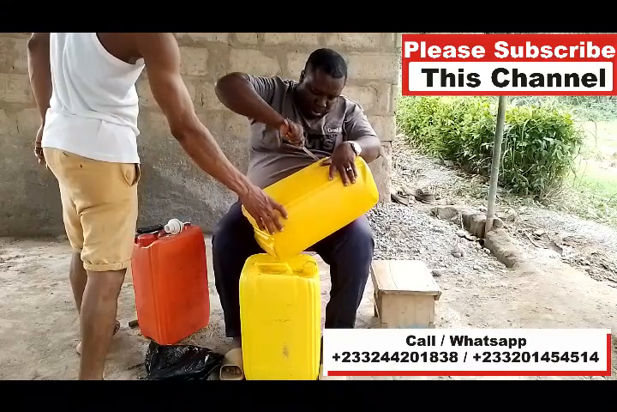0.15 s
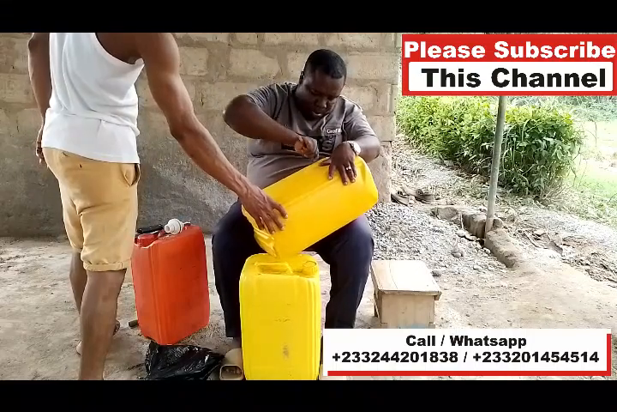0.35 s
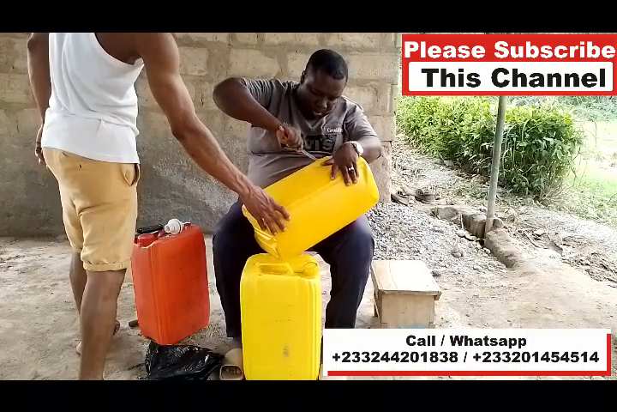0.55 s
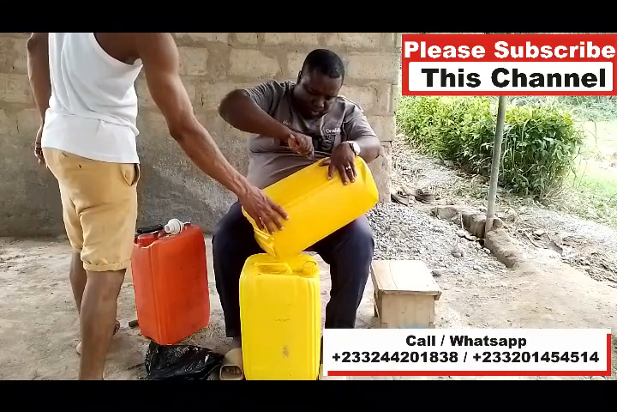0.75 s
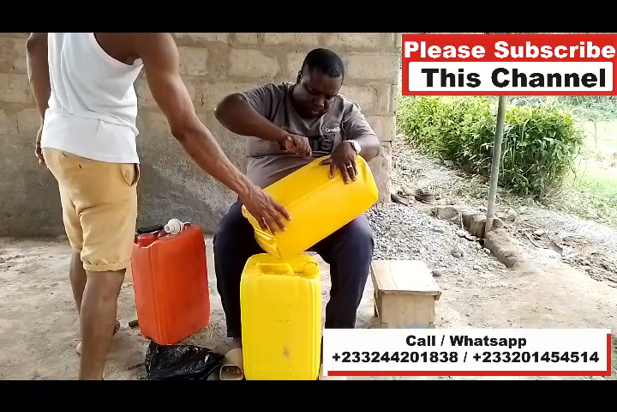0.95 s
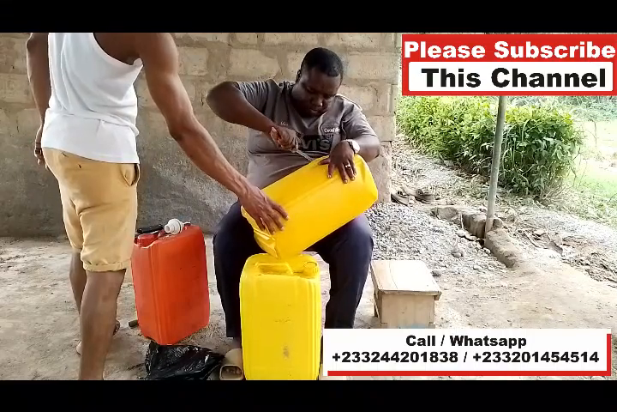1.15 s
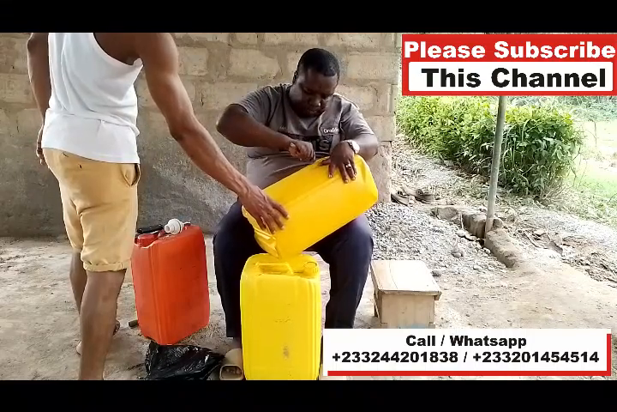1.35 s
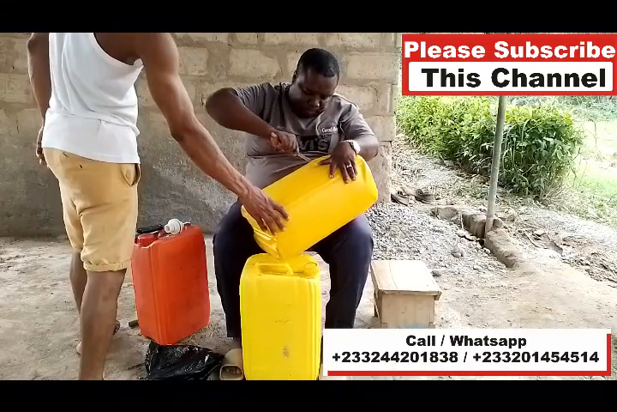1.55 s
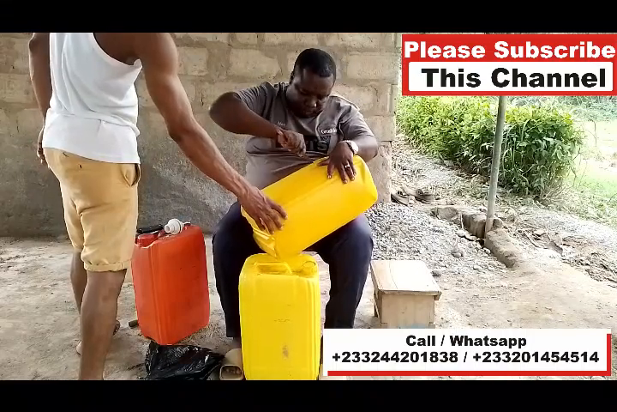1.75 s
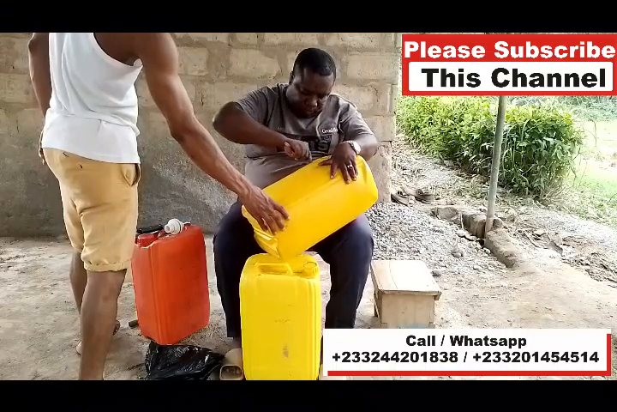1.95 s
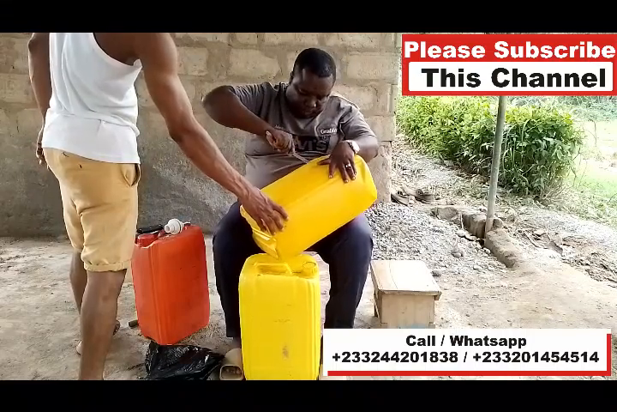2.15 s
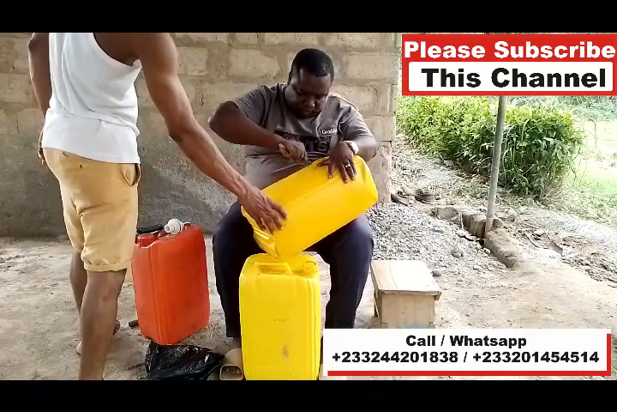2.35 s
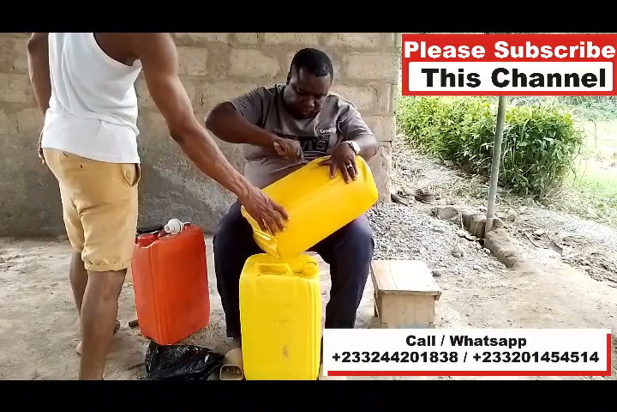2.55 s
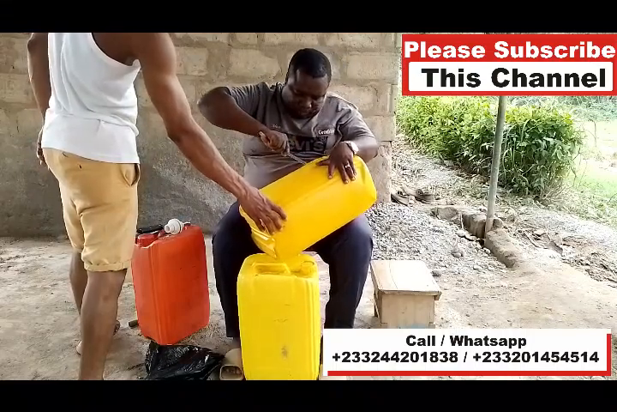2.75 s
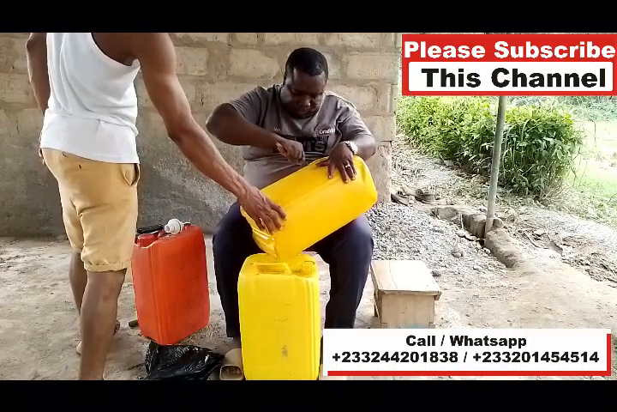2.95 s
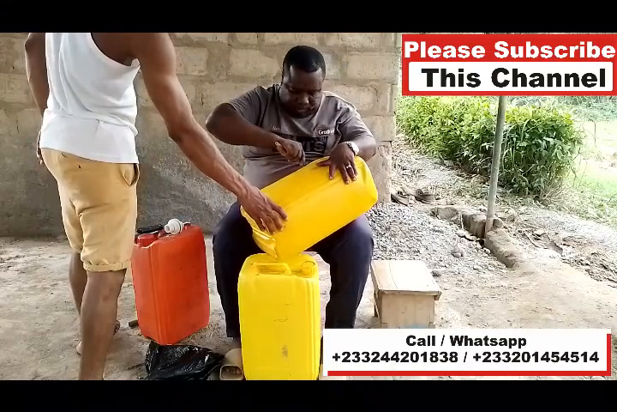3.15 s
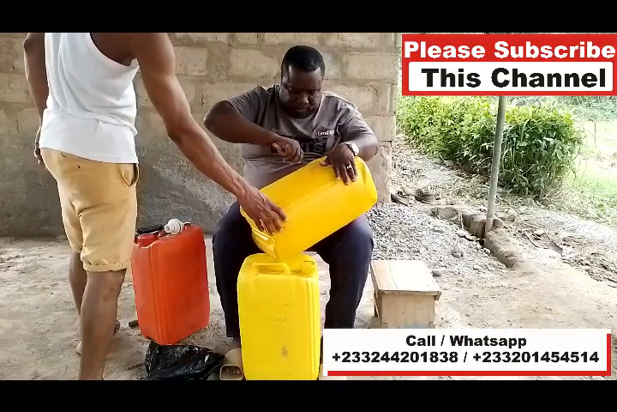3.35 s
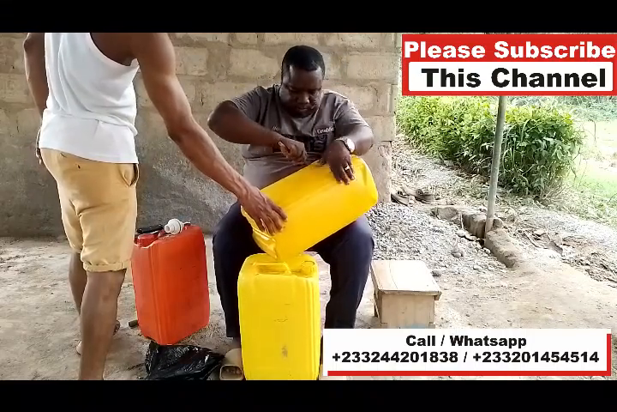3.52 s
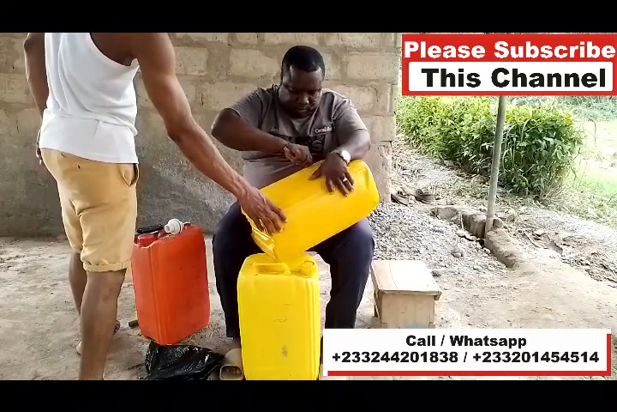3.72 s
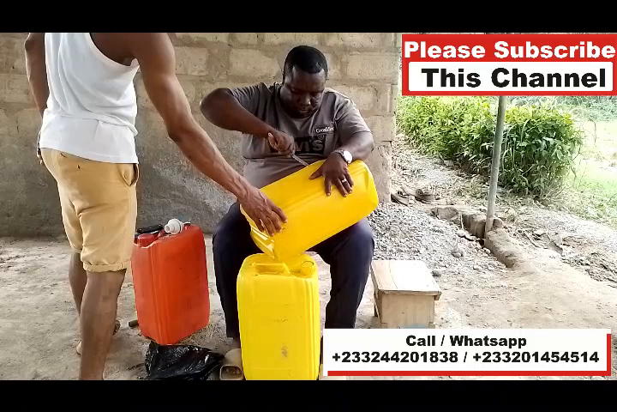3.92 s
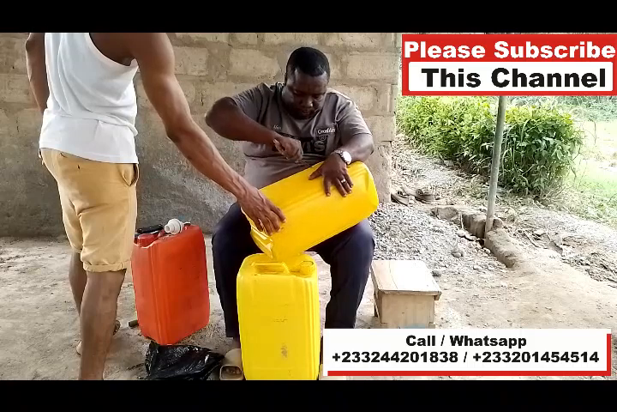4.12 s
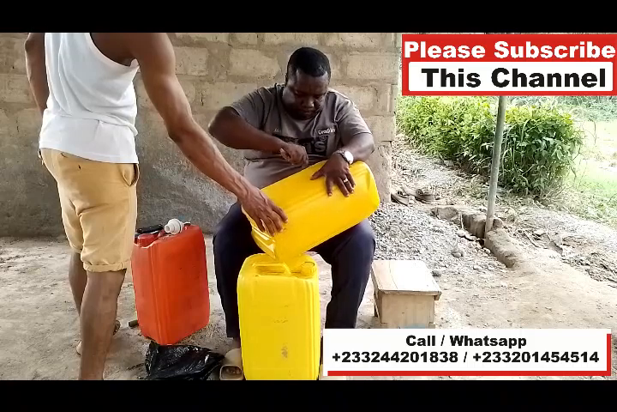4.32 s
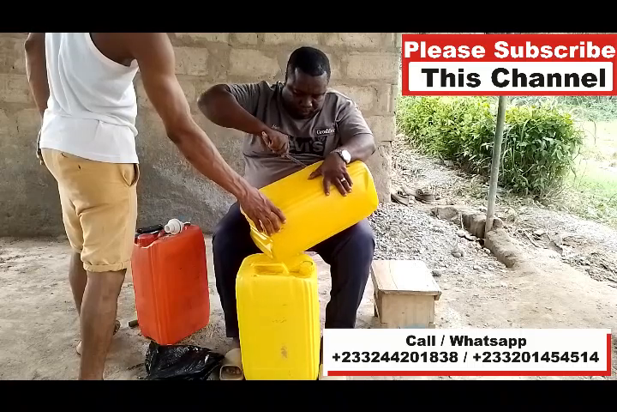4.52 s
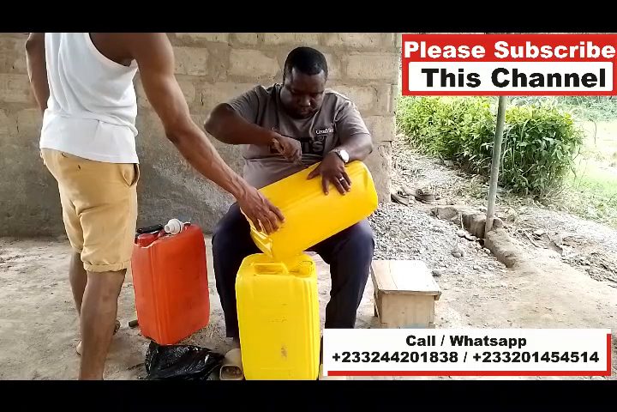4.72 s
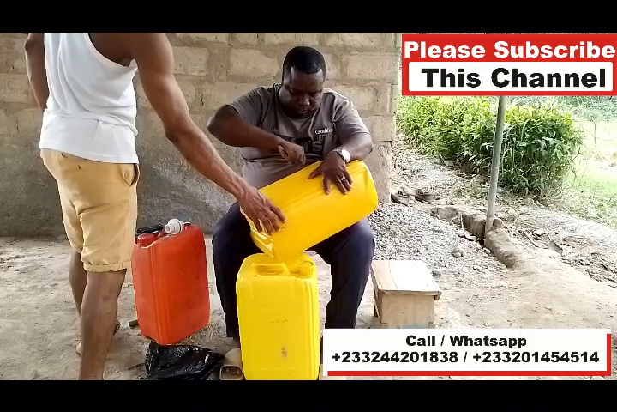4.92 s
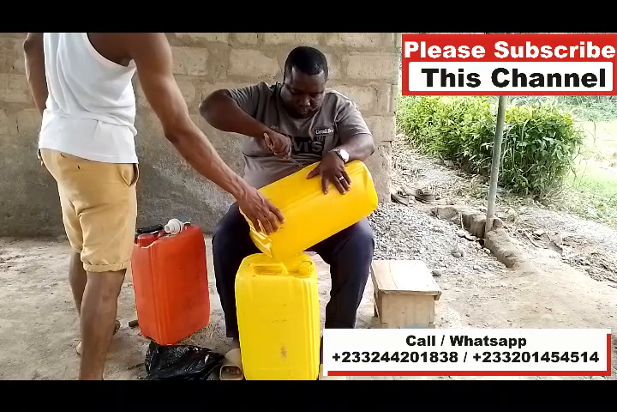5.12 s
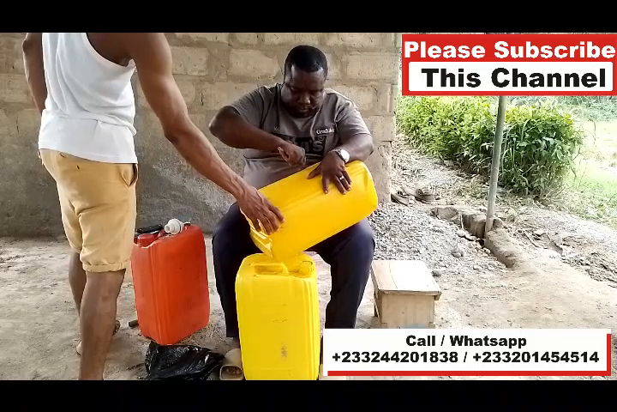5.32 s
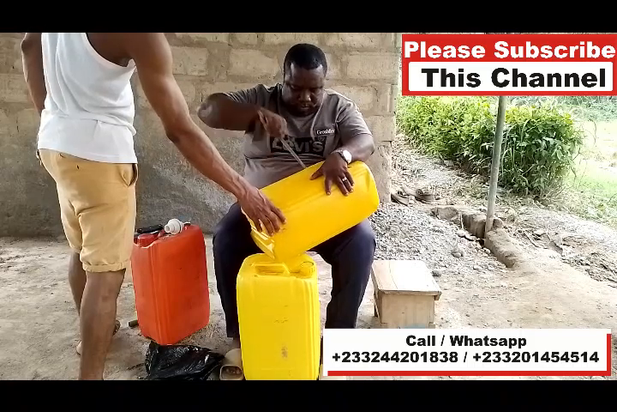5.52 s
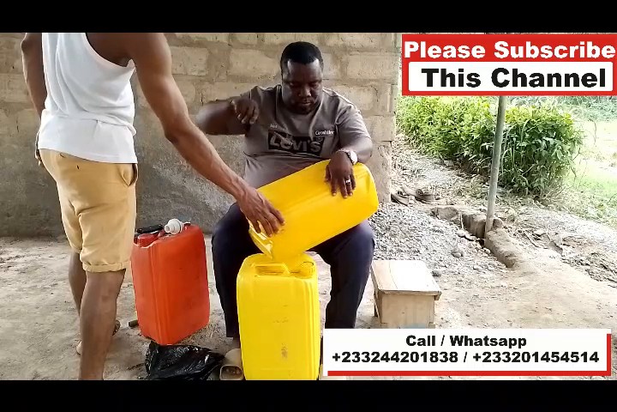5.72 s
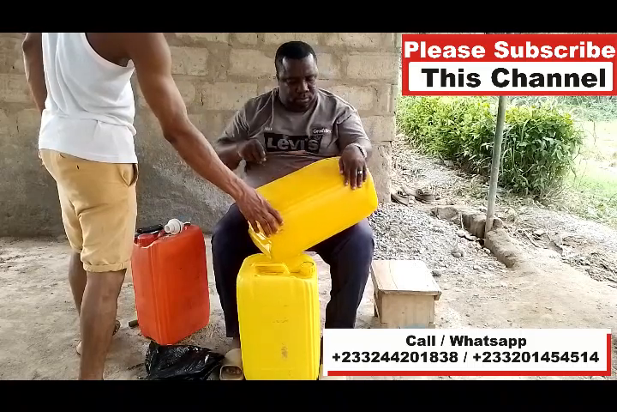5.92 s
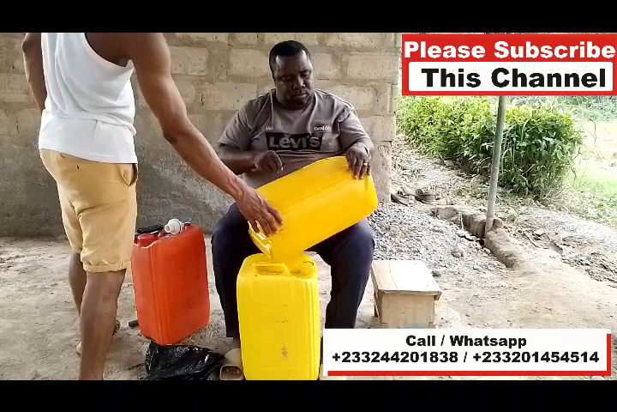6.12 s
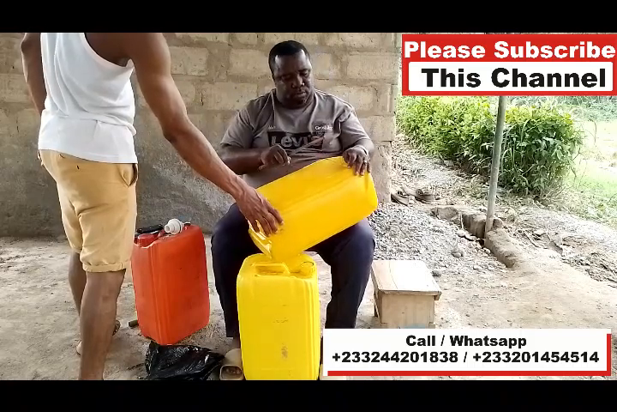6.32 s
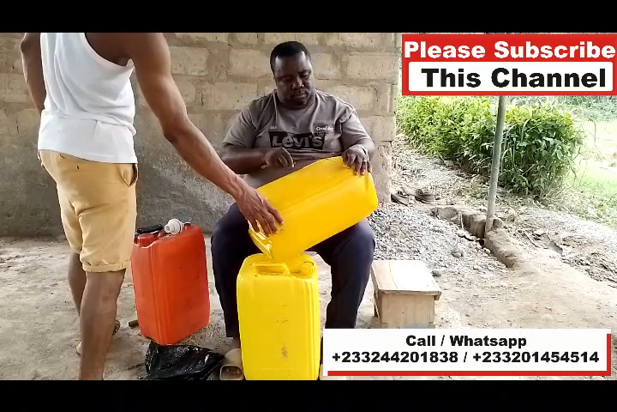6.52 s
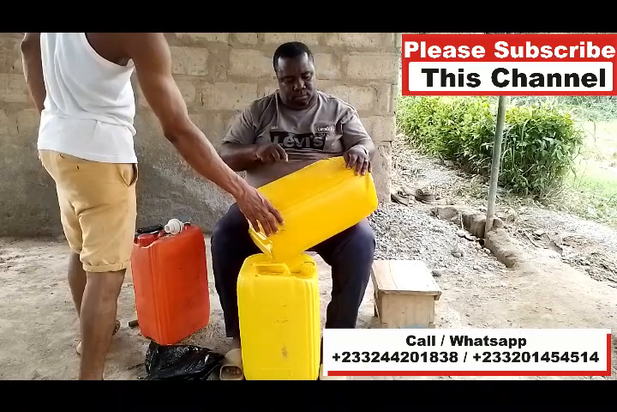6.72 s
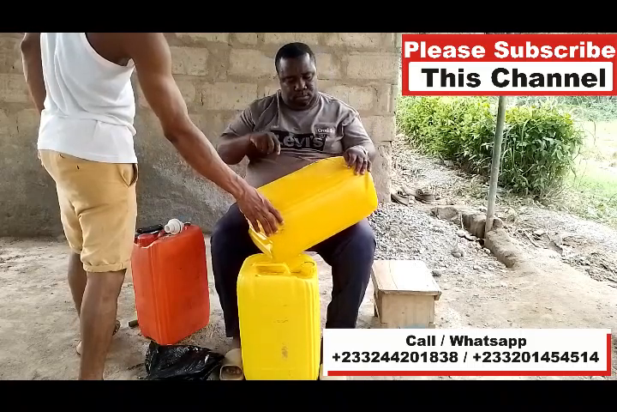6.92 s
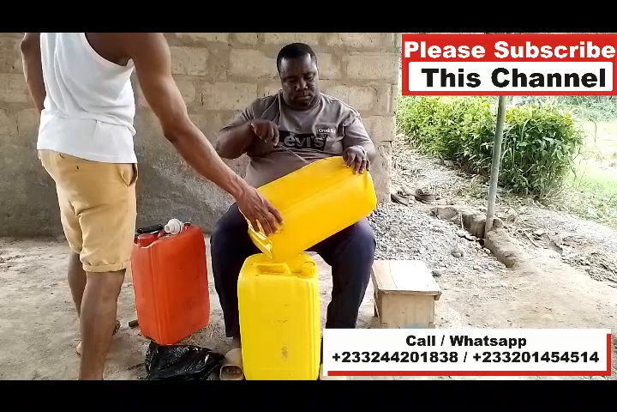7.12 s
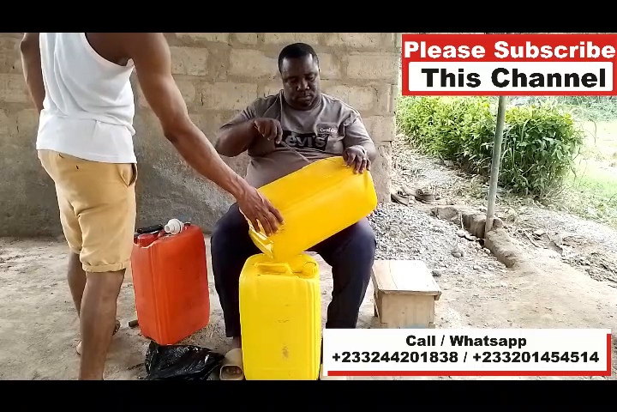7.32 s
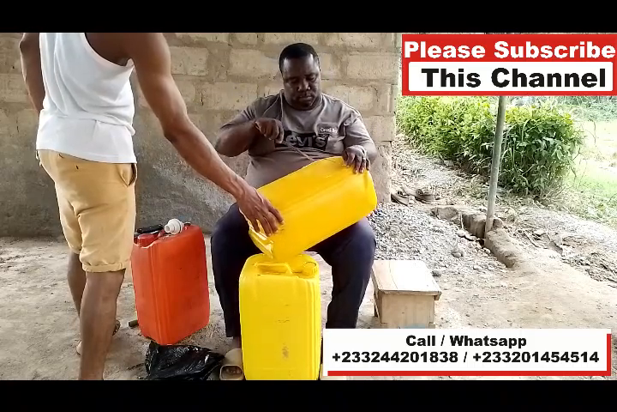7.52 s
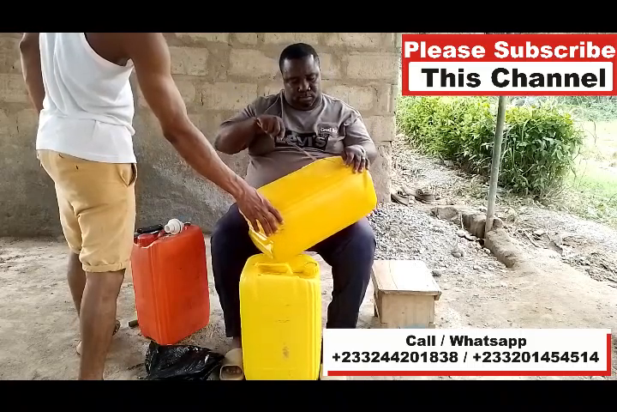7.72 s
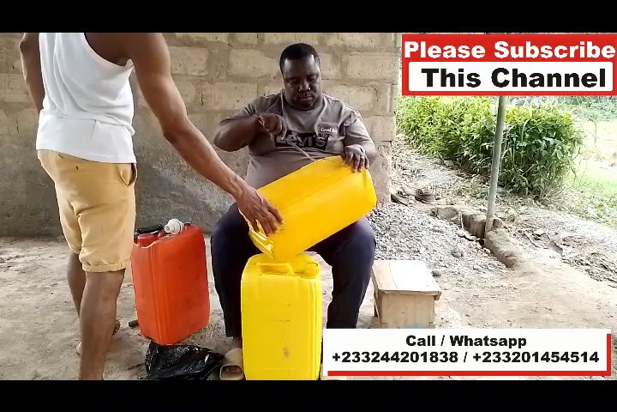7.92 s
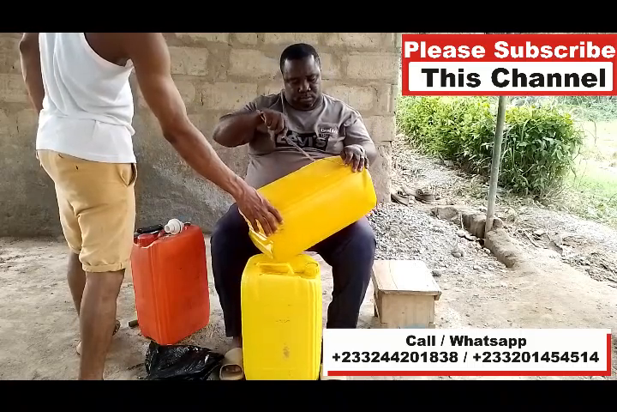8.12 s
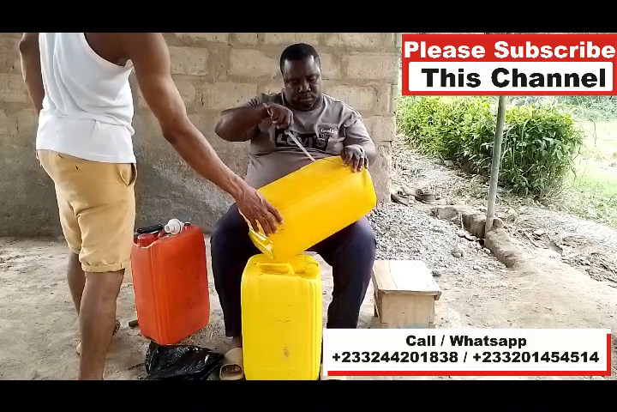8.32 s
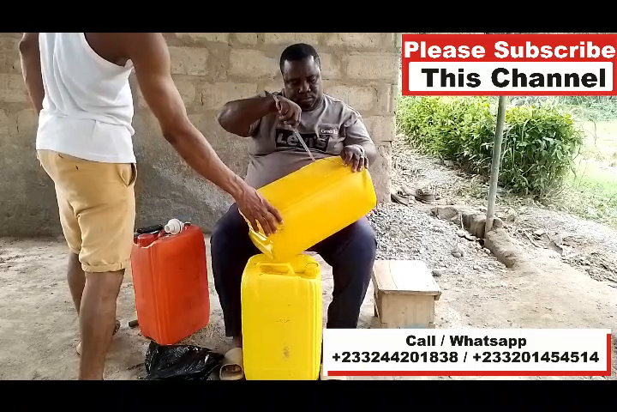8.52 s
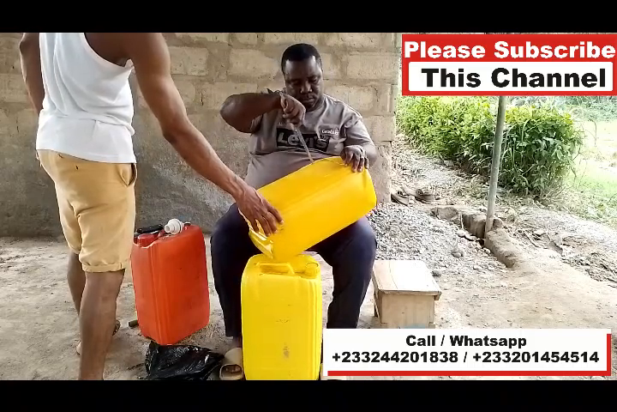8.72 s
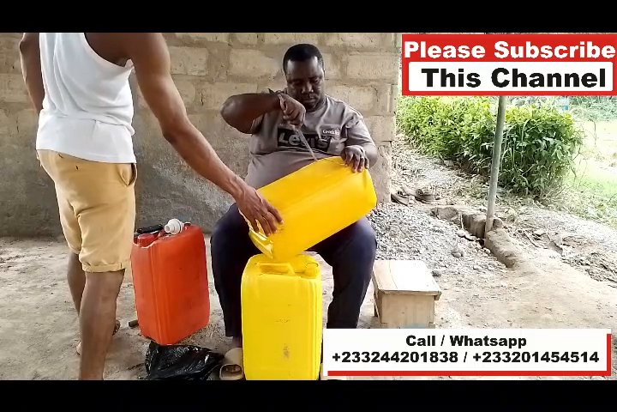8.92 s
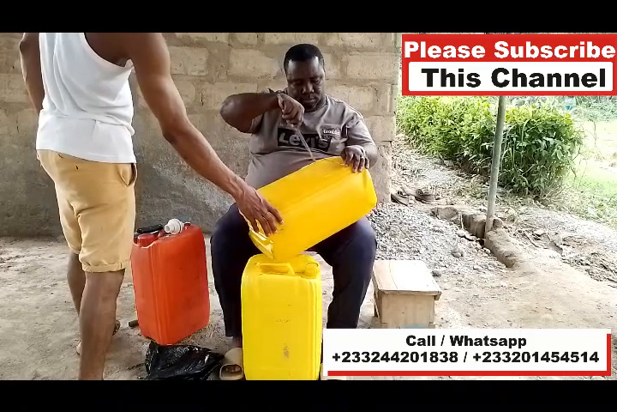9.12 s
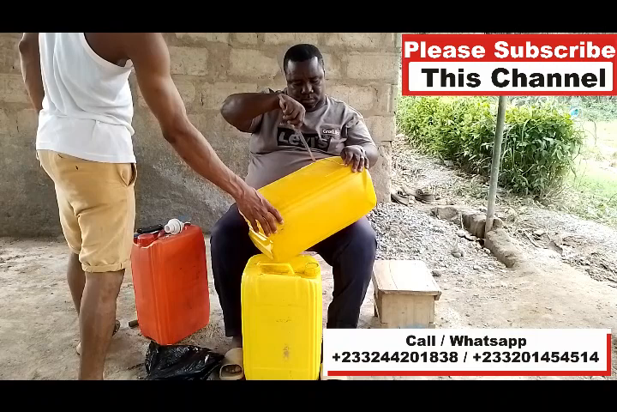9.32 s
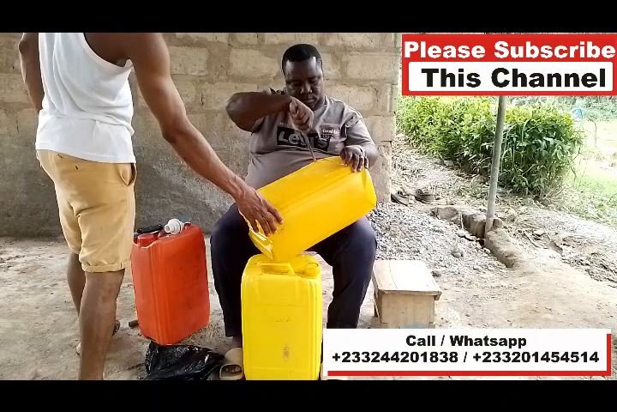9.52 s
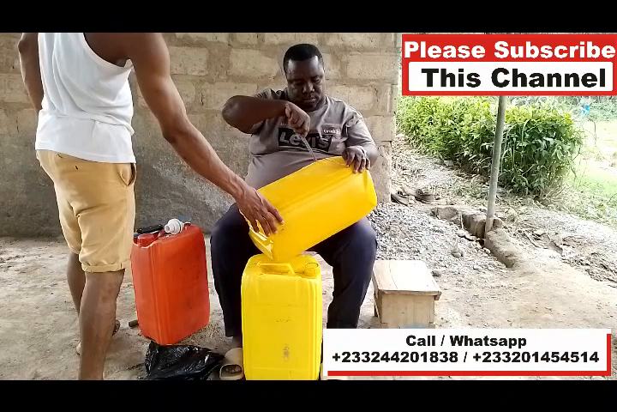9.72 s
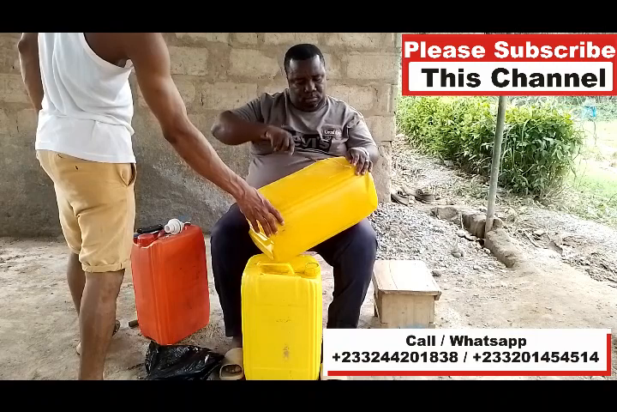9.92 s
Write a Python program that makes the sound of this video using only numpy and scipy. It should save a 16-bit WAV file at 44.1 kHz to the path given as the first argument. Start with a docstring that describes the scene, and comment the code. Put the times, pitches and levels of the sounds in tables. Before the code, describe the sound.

From the very start a toothed blade saws the wall of an empty plastic jerrycan, close and loud. Strokes come about every quarter to third of a second until 3.1, each roughly 0.15 to 0.2 long: a rough rapid tooth buzz ringing hollow and boxy in the midrange, with a thin steely rasp; stronger strokes alternate with weaker ones. From 3.1 to 3.8 there is a gap with soft rubbing, two small ticks and a faint false start. A second burst runs 3.85 to 5.65, equally forceful. At 5.8 to 6.4 hands slide softly over plastic. From 6.6 to 9.1 come scattered quiet ticks, knocks and tiny scrapes, over soft outdoor wash, low hiss and a faint wavering hum. At 9.5 one short, dull, weaker stroke sounds; faint thin chirps appear around 9.45 and 9.8 to 9.95. Short echoes suggest a sheltered yard.

```python
"""A blade saws the wall of an empty plastic jerrycan in a sheltered yard: two bursts and one last stroke.
Uneven tooth clicks drive the can's decaying modes and dense wall noise; filtered grit adds a steely rasp.
Rubbing is shaped grit; knocks are ticks and blows into the same modes; thin chirps are wavering sines.
Behind lie sparse-tap echoes, a drifting noise wash and a faint hum.
Two microphone ports, each with its own treble resonance, hear it with hiss and clip peaks."""
import sys
import numpy as np
from scipy import signal
from scipy.fft import rfft, irfft, next_fast_len
from scipy.io import wavfile
from scipy.ndimage import uniform_filter1d

SR = 44100
rng = np.random.default_rng(int(sys.argv[2]) if len(sys.argv) > 2 else 0)


def store_wav(level_fs):
    """Save 16-bit WAV to argv[1]."""
    pcm = np.round(np.clip(np.atleast_2d(level_fs), -1, 1) * 32767)
    wavfile.write(sys.argv[1], SR, pcm.T.astype(np.int16))


N = 438794

# All pans: left minus right/dB.
# Saw strokes: [start/s, rise/s, hold/s, push/dB, swell over hold/dB, fade/(dB/s), bite brightness re push/dB,
# sharp edge re push/dB, initial tooth rate/(1/s), rasp hold start after stroke start/s, rasp hold/s,
# rasp at mid-hold/dB, rasp pan/dB]
STROKES = [ (0.018, 0.038, 0.077, -14, 0.5, 219, -4.5, -12, 637, 0.069, 0.051, -38.5, 5),
           (0.262, 0.11, 0.023, -14.5, -5.5, 182, -4.5, -29.5, 490, 0.062, 0.14, -49, 2.5),
           (0.523, 0.047, 0.055, -11.5, 2.5, 237.5, -3.5, -10.5, 527, 0.062, 0.056, -40, 4.5),
           (0.778, .05, .07, -19, 5.5, 270.5, -4, -21.5, 533, 0.09, 0.016, -46.5, -1.5),
           (1.019, 0.032, .11, -10.5, -5, 253.5, -3.5, -12.5, 548, 0.047, 0.086, -43.5, 6.5),
           (1.302, 0.045, 0.096, -14.5, -11, 231.5, -6, -15, 620, 0.065, 0.0077, -45, -5.5),
           (1.518, 0.025, .12, -13.5, 0, 305.5, -4, -13.5, 612, 0.074, 0.064, -46, 3),
           (1.85, 0.041, 0.066, -16, -3.5, 295, -6.5, -15.5, 630, 0.05, 0.0078, -46.5, 10.5),
           (2.034, 0.061, 0.088, -11, 0.5, 193.5, -5, -13.5, 605, 0.075, 0.12, -44.5, 7),
           (2.386, 0.018, 0.091, -17.5, -2, 296, -4, -26, 558, 0.033, 0.036, -57.5, -5.5),
           (2.607, 0.031, 0.11, -12, 0.5, 238.5, -4, -15.5, 562, 0.11, 0.037, -40.5, 8),
           (2.953, 0.018, 0.06, -19.5, 2, 210, -7, -18.5, 545, 0.073, 0.0092, -50.5, -6.5),
           (3.61, 0.06, 0.06, -32, 3, 387, -5.5, -40.5, 284, 0.026, 0.17, -57.5, -6),
           (3.858, 0.046, 0.12, -11, -1.5, 241.5, -5.5, -16, 472, 0.082, 0.071, -36.5, 6),
           (4.164, 0.011, 0.11, -26, 10.5, 232, -1, -26, 500, 0.12, 0.038, -46, 6.5),
           (4.413, 0.029, 0.099, -14.5, 7, 264, -3.5, -16, 424, 0.052, 0.11, -43.5, 6),
           (4.718, 0.0043, .012, -12, -6, 252.5, -10.5, -37, 442, 0.01, 0.023, -68.5, -6),
           (4.781, 0.072, 0.041, -20.5, 7, 299.5, -6.5, -19, 690, 0.087, .01, -47, -2.5),
           (5.0, 0.028, .095, -9.5, -1, 259, -3.5, -14, 556, 0.1, 0.016, -35, 3.5),
           (5.262, .032, 0.099, -24.5, 8, 301, -1.5, -25, 597, .096, 0.026, -49.5, 3),
           (5.488, 0.024, .1, -14, -4.5, 233, -2, -7.5, 637, 0.085, 0.043, -36.5, 0.5),
           (9.516, 0.017, 0.11, -23.5, -0.5, 205, -6, -34, 660, 0.0084, 0.12, -60.5, -7), ]
# Brief skids of the blade along the edge: [t/s, rasp/dB, pan/dB, fade/(dB/s)]
SKIDS = [(0.002, -46, 7.5, 100), (0.244, -46.5, 5, 202), (0.318, -50, 1, 110), (0.47, -43, 9, 153),
         (0.862, -50.5, 3.5, 200), (1.342, -37.5, 2.5, 101), (1.45, -75, -1, 210), (1.822, -60, 16.5, 46),
         (1.885, -49, -1, 81), (1.64, -43, 1, 157), (2.03, -54, 10, 51), (2.42, -55.5, 9, 67),
         (2.624, -52.5, -1.5, 46), (2.876, -52.5, 6.5, 249.5), (3.652, -49.5, -1, 105),
         (4.172, -56, -1, 500), (4.445, -47.5, 2.5, 102.5), (4.545, -45, 9.5, 244), (5.24, -63, 0.5, 30),
         (5.699, -58, -2, 63)]
# Snags, the push changing for a moment: [t/s, boom change/dB, bite change/dB, 1/e half length/s]
SNAGS = [(0.027, -0.5, 13, .015), (.1, -1, 6, 0.02), (.137, 11.5, -2, 0.0057), (0.235, 10, 6, 0.019),
         (0.339, 3, -2, 0.012), (.48, -3, 16.5, .025), (0.563, 1.5, 5, .01), (0.631, 1.5, -6.5, 0.008),
         (0.791, 7, -3, 0.014), (0.838, -0.5, -3, 0.02), (0.876, 0.5, 1.5, .015), (1.067, -4, 4, 0.0061),
         (1.129, 6.5, 1, 0.015), (1.359, 4, 7, 0.02), (1.415, 3, 7, .01), (1.66, -2.5, -2.5, 0.012),
         (1.925, 9, 7.5, 0.015), (2.037, -3, 6.5, 0.026), (2.101, 2.5, 0, 0.0077), (2.439, 5, 8.5, 0.012),
         (2.501, 8, 7, .008), (2.693, 4.5, 0.5, 0.018), (2.752, 4, -4, 0.0054), (3.044, 3.5, 0.5, 0.013),
         (3.956, 2.5, 5.5, 0.037), (4.191, 5.5, -9, .012), (4.266, 3, 0.5, .012), (4.556, -0.5, -5, 0.013),
         (4.745, 0.5, 4, 0.013), (4.9, 3.5, 5, 0.0083), (5.039, 2, 0, 0.0096), (5.111, 2, -1, 0.014),
         (5.359, 4.5, 3, .01), (5.391, 9.5, 0, 0.01), (5.497, 9, 0, 0.013), (5.582, -5, 2, 0.039),
         (9.526, 7.5, 4, 0.0082), (9.583, 6.5, 3, 0.01), (9.598, -7, 3, .012)]
# Modes of the can: [f/Hz, width/Hz, relative level/dB]
CAN_MODES = [(96.5, 30, -17.5), (158, 30, -24), (181.6, 15.1, -13.5), (200.3, 9.6, -11.5),
             (244.7, 18, -9.5), (317.6, 37.2, -2), (356, 22.2, -8), (424.2, 25.8, 0), (434.2, 24.6, -3),
             (467.8, 26.5, -4.5), (512.6, 52.4, -3), (578.6, 32.9, -3.5), (661, 14.7, -5),
             (784.3, 48.6, -15.5), (807.7, 25.6, -6.5), (956.7, 44, -6.5), (1042.7, 51, -7),
             (1125, 27, -8.5), (1172, 7.1, -6.5), (1246.5, 76, -13), (1456, 32, -19.5), (1596.6, 40, -20.5),
             (1648, 15, -28.5)]
# Weak bass radiation of a small can: [f/Hz, gain/dB]
CAN_TILT = [(30, -49), (65, -28.5), (95, 1), (1700, 6.5)]
# Crowded small modes of the wall: [f/Hz, relative level/dB]
WALL_SPECTRUM = [(300, -35.5), (700, 4), (1200, -6.5), (2000, -8), (2800, -14.5), (3500, -22), (5000, -37),
                 (7000, -42)]
# Steel teeth on the cut edge: [f/Hz, relative level/dB]
RASP_SPECTRUM = [(300, -62), (1500, 9), (3000, 3), (4500, 1), (6000, -5.5), (8000, 4), (10000, -11),
                 (12000, 1.5), (14000, -4)]
# Hands and sleeve sliding on the can, one list per passage: [t/s, level/dB, pan/dB]
RUBS = [
    [(3.2, -67, -7), (3.392, -56.5, 1), (3.65, -61.5, 3.5)],
    [(5.78, -60, 0), (5.84, -51, 0), (5.9, -43.5, 2), (6.0, -47.5, -1), (6.13, -48.5, -1), (6.3, -53.5, 2),
     (6.4, -60, 3), (6.64, -72, 7), (7.02, -66, 10), (7.47, -61, 6.5), (7.88, -73, 6), (8.77, -87, 1),
     (8.9, -68.5, -10), (9.5, -85.5, -11)],
]
# Skin and cloth on plastic: [f/Hz, relative level/dB]
SKIN_SPECTRUM = [(300, -14), (1000, 6), (2500, 0), (5000, -2), (7500, -4.5), (10000, -6.5), (14000, -1)]
# Knocks, ticks, and the blade catching as a stroke starts:
# [t/s, tick/dB, blow re tick/dB, boom re blow/dB, tick pan/dB, scrape decay time/s]
KNOCKS = [(0.531, -41.5, 13.5, 5.5, 9, 0.035), (1.341, -31.5, -11, 12, 0, .015),
          (1.4426, -40, 15, -8, 8, 0.016), (1.524, -52, 21, 4.5, -8, 0.013),
          (2.9574, -64, 11, 12, -1, 0.012), (3.297, -48, -5, -11, -7, 0.016),
          (3.5595, -49, -18, -4, -5, .021), (3.8689, -45, 5, 2, 5, .013), (4.7316, -52, 23, 5, 0, 0.014),
          (5.782, -37.5, -21, 10, 1, .013), (6.607, -56, -31, 2, 1, 0.011), (6.718, -53, -1.5, 1, -4, .01),
          (6.974, -44, -6.5, -1, -2, 0.012), (7.201, -53.5, 8, -7, 2, 0.035),
          (7.2833, -40, 0, 1, -4, 0.017), (7.403, -55, -3, -1, 3, 0.019), (7.436, -59, -6, -5, -2, .011),
          (7.495, -52, -36, 0, -3, .015), (7.561, -52.5, -24, 0, -5, .015), (7.607, -52, 11, -3, -2, 0.031),
          (7.779, -66, 4, 12, 1, .011), (7.871, -57, -26, -3, 0, .017), (7.947, -57.5, -4, -8, -7, 0.012),
          (8.336, -53, -5, -9.5, -6, .015), (8.504, -57, -11, 0, -6, .013),
          (8.809, -54.5, 4.5, 4, -5, 0.024), (8.841, -55, 2, 1, -10, .029),
          (8.978, -55.5, 4.5, -6, -12, 0.025), (9.112, -63, 5.5, 4, -10, 0.072),
          (9.521, -50, 17, -3, -5, .01)]
# Faint thin far chirps: [t/s, level/dB, f/Hz, length/s]
CHIRPS = [(9.443, -60, 2515, .04), (9.44, -61, 1288, 0.042), (9.784, -62, 1302, 0.18),
          (9.872, -52, 2950, 0.026), (9.88, -52.5, 1360, 0.024), (9.925, -55, 2880, 0.039)]
# Echo colour of walls and ground: [f/Hz, gain/dB]
ECHO_SPECTRUM = [(100, -10), (400, -11.5), (800, -5), (1500, -3), (5000, 1.5), (14000, -20.5)]
# Echo decay: [f/Hz, T60/s]
ECHO_T60 = [(200, 0.29), (1000, 0.2), (5000, 0.043), (14000, 0.037)]
# Yard wash: [f/Hz, relative level/(dB per Hz)]
YARD_SPECTRUM = [(15, -31.5), (25, -4.5), (48, -2.5), (91, -16), (151, -31), (237, -6), (301, 1.5),
                 (511, -4), (1470, -18), (2440, -21.5), (4600, -31), (10700, -34.5), (14000, -25.5)]
# Left-right likeness of the wash: [f/Hz, correlation]
YARD_LIKENESS = [(60, 0.074), (240, 0.6), (950, 0.22), (3760, 0.03), (15000, 0.01)]
# Wash level: [t/s, level/dB]
YARD_LEVEL = [(0, -42.5), (3.4, -54.5), (6, -52), (7.7, -52), (8.1, -54.5), (8.8, -52.5), (9.95, -51.5)]
# Far wavering hum: [t/s, level/dB]
HUM_LEVEL = [(5.9, -60), (6.09, -55), (6.24, -74), (6.36, -61), (6.62, -52.5), (7.11, -56.5), (7.3, -51.5),
             (7.51, -68), (7.81, -54), (7.92, -69.5), (8.01, -80), (8.77, -54), (9.0, -69)]
# Port cavities, left then right: [f/Hz, width/Hz, gain well below resonance/dB]
PORTS = [(7456, 527, -0.5), (10650, 770, 0.0)]

CATCH_DB = -15.5  # stroke onset re push
# The bite starts dull, brightens, then dulls again; the sharp edge comes in later still.
DULL_START_DB, BRIGHTEN_S, DULLING_DB_PER_S = -10.5, .03, -17
SHARP_START_DB, SHARPEN_S = -12.5, 0.044
SHARP_LINGERS = 0.14  # share of the fade the sharp edge is spared
SLOWING_PER_S2, SLOWEST_PER_S = 900, 250  # tooth rate falls through a stroke
JUDDER_DB = .5  # uneven hand pressure
RASP_RISE_DB_PER_S, RASP_FADE_DB_PER_S = 221, 196
RASP_SWELL_DB_PER_S = 43.5  # growth while held
SKID_RISE_S = .012
# With time the wall flaps more on its lowest modes and the highest modes ring less.
LOOSEN_DB_PER_S, LOOSE_START_DB, LOOSEST_DB = 3, -30, -15
TOP_START_DB, TOP_SINKS_DB_PER_S, TOP_LEAST_DB = -4.5, 1.9, -18
HUM_HZ = 260
HISS_DB = -56
BAND_LIMIT_HZ = 14300


def saw(rings):
    """Teeth pass at the blade's speed, catching unevenly; loose slips and a steely rasp fill in."""
    push, bright, sharp, teeth_per_s, rasp = strokes()
    t = np.arange(N) / SR
    loose_db = np.minimum(LOOSE_START_DB + LOOSEN_DB_PER_S * t, LOOSEST_DB)
    top_db = np.maximum(TOP_START_DB - TOP_SINKS_DB_PER_S * t, TOP_LEAST_DB)

    wobble = evened(uniform_filter1d(rng.standard_normal(N), 100))
    teeth_count = np.cumsum(teeth_per_s * (1 + .1 * wobble)) / SR
    passed = np.diff(np.floor(teeth_count), prepend=0) > 0
    bites = passed * gain_of(5.85 * rng.standard_normal(N))
    bites = evened(bites - uniform_filter1d(bites, 300))  # steady push is silent
    teeth = 0.64 * bites + 0.72 * slips(900, spread_db=4.0)
    teeth *= gain_of(JUDDER_DB * evened(uniform_filter1d(rng.standard_normal(N), 700)))

    bright_force = teeth * bright
    can = struck(
        rings,
        flap=teeth * push * gain_of(loose_db),
        boom=teeth * push,
        ring=bright_force * gain_of(-3.0),
        top=bright_force * gain_of(top_db),
        wall=bright_force * gain_of(-5.0),
        edge=teeth * sharp * gain_of(-4.0))

    grit = np.array([slips(5000, spread_db=3.0), slips(3600, spread_db=-2.5)])
    grit = evened(patchy(coloured(grit, RASP_SPECTRUM), patchy_db=3.0))
    grit *= 1 + 0.13 * evened(uniform_filter1d(passed * 1., 30))  # throbs tooth by tooth
    return can + rasp * grit


def strokes():
    """Blade controls in time: push, bright and sharp push, tooth rate, rasp at each port."""
    clock = np.arange(N) / SR
    push, bright, sharp = np.zeros((3, N))
    teeth_per_s = np.full(N, float(SLOWEST_PER_S))
    rasp = np.zeros((2, N))
    for (start, rise, hold, push_db, swell_db, fade, bright_db, sharp_db,
         teeth, delay, held, rasp_db, pan_db) in STROKES:
        at = slice(max(round((start - .2) * SR), 0), round((start + .6) * SR))
        t = clock[at] - start
        faded_db = fade * np.maximum(t - rise - hold, 0)
        shape_db = np.interp(t, [0, rise, rise + hold], [CATCH_DB, 0, swell_db])
        level = gain_of(push_db + shape_db - faded_db) * np.clip(t / 0.0027, 0, 1)
        brighten_db = DULL_START_DB * np.exp(-abs(t) / BRIGHTEN_S) + DULLING_DB_PER_S * t
        sharpen_db = SHARP_START_DB * np.exp(-abs(t) / SHARPEN_S) + SHARP_LINGERS * faded_db
        push[at] += level
        bright[at] += level * gain_of(bright_db + brighten_db)
        sharp[at] += level * gain_of(sharp_db + sharpen_db)
        slowing = np.maximum(teeth - SLOWING_PER_S2 * t, SLOWEST_PER_S)
        teeth_per_s[at] = np.where(t > 0, slowing, teeth_per_s[at])

        short_db = RASP_RISE_DB_PER_S * np.maximum(delay - t, 0)
        short_db += RASP_FADE_DB_PER_S * np.maximum(t - delay - held, 0)
        short_db += RASP_SWELL_DB_PER_S * np.clip(delay + held / 2 - t, -held / 2, held / 2)
        rasp[:, at] += gain_of(rasp_db - short_db + np.outer([.5, -.5], [pan_db]))

    for s, rasp_db, pan_db, fade in SKIDS:
        at = slice(max(round((s - SKID_RISE_S) * SR), 0), round((s + 0.3) * SR))
        t = clock[at] - s
        skid_db = rasp_db - fade * np.maximum(t, 0) + np.outer([.5, -.5], [pan_db])
        rasp[:, at] += np.clip(1 + t / SKID_RISE_S, 0, 1) * gain_of(skid_db)

    snag_db = np.zeros((2, N))
    for s, boom_db, bite_db, half in SNAGS:
        at = slice(max(round((s - .1) * SR), 0), round((s + .1) * SR))
        snag_db[:, at] += np.outer([boom_db, bite_db], np.exp(-((clock[at] - s) / half) ** 2))
    boom, bite = gain_of(snag_db)
    return push * boom, bright * bite, sharp * bite, teeth_per_s, rasp


def slips(per_s, spread_db):
    """Stick-slip clicks at random times, of uneven size and random sign."""
    size = gain_of(spread_db * np.minimum(rng.exponential(1, N), 4))
    return evened(size * (rng.random(N) < per_s / SR) * rng.choice([-1, 1], N))


def can_rings(flap_hz=230, ring_hz=870, top_hz=1350, edge_hz=1750, wall_t60=0.075):
    """Click responses: four bands of decaying modes, then six wall patches, dull and sharp parts."""
    t = np.arange(8192) / SR
    rings = np.zeros((4, len(t)))  # flap, boom, ring, top
    for k, (hz, width, db) in enumerate(CAN_MODES):
        band = (hz > flap_hz) + (hz > ring_hz) + (hz > top_hz)
        decay = np.exp(-np.pi * width * t)
        rings[band] += gain_of(db) * width * decay * np.sin(2 * np.pi * (hz * t + k / 4))
    rings = coloured(rings, CAN_TILT)
    rings /= np.linalg.norm(rings, axis=1, keepdims=True)
    # thin wall: too many modes to count, so dying noise
    wall = coloured(rng.standard_normal((6, len(t))), WALL_SPECTRUM) * gain_of(-60 * t / wall_t60)
    sharp = signal.sosfilt(signal.butter(4, edge_hz, "high", fs=SR, output="sos"), wall)
    dull = signal.sosfilt(signal.butter(4, edge_hz, "low", fs=SR, output="sos"), wall)
    return np.vstack([rings, dull / np.linalg.norm(dull[0]), sharp / np.linalg.norm(sharp[0])])


def struck(rings, flap, boom, ring, top, wall, edge):
    """Convolves forces with the can's responses; the wall patch that answers keeps changing."""
    choice = np.repeat(rng.integers(0, 6, N // 1500 + 1), 1500)[:N]
    patch = choice == np.arange(6)[:, None]
    forces = np.vstack([flap, boom, ring, top, wall * patch, edge * patch])
    return signal.oaconvolve(forces, rings, axes=1).sum(0)[:N]


def patchy(x, patchy_db):
    """Colour drifting in patches of pitch and time."""
    z = signal.stft(x, nperseg=512)[2]
    patches = uniform_filter1d(rng.standard_normal(z.shape), 9, 1)
    patches = evened(uniform_filter1d(patches, 9, 2))
    return signal.istft(z * gain_of(patchy_db * patches), nperseg=512)[1][:, :N]


def rub():
    """Fine grit of skin and cloth sliding over plastic."""
    (level_db, pan_db), on = curves(RUBS)
    grit = np.array([slips(8000, spread_db=3.5), slips(8700, spread_db=3.0)])
    level = gain_of(level_db + np.outer([.5, -.5], pan_db)) * on
    return level * evened(coloured(grit, SKIN_SPECTRUM))


def knocks(rings):
    """Sharp ticks, with a blow and a short dying scrape driving the can."""
    ticks, blows = np.zeros((2, 2, N + SR))
    t = np.arange(6000) / SR
    noise = rng.standard_normal((len(KNOCKS), 3, len(t)))
    tick_shape = np.exp(-t / 0.0025) + 0.56 * np.exp(-t / 0.045)
    for (s, db, blow_db, boom_db, pan_db, length), (left, right, rough) in zip(KNOCKS, noise):
        at = slice(round(s * SR), round(s * SR) + len(t))
        tick_gain = gain_of([[db + pan_db / 2], [db - pan_db / 2]])
        ticks[:, at] += tick_gain * [left, right] * tick_shape
        scrape_shape = 1.5 * np.exp(-t / 0.0014) + np.exp(-t / max(length, .002))
        force = 9.3 * (t == 0) + rough * scrape_shape
        blows[:, at] += gain_of([[db + blow_db], [db + blow_db + boom_db]]) * force
    blow, boom = blows[:, :N]
    can = struck(rings, flap=.1 * boom, boom=2.0 * boom, ring=0.93 * blow,
                 top=0.12 * blow, wall=1.0 * blow, edge=0.25 * blow)
    return coloured(ticks, RASP_SPECTRUM)[:, :N] + can


def chirps():
    """Short sine tones, phase-wavered at 40 Hz."""
    out = np.zeros(N + SR)
    for s, db, hz, length in CHIRPS:
        t = np.arange(round(length * SR)) / SR
        tone = np.sin(2 * np.pi * hz * t + 1.19 * np.sin(2 * np.pi * 40 * t))
        out[round(s * SR):][:len(t)] += gain_of(db) * np.hanning(len(t)) * tone
    return out[:N]


def echoes(x):
    """Sparse random-sign taps, separate for each port, each band dying at its own speed."""
    taps = np.zeros((2, SR // 2))
    at = np.arange(150, SR // 2 - 20, 20)
    at = at + rng.integers(0, 20, (2, len(at)))
    np.put_along_axis(taps, at, rng.choice([-1., 1.], at.shape), 1)
    hz, t, z = signal.stft(taps, SR, nperseg=256)
    z = z * gain_of(-60 * t / read(ECHO_T60, hz)[:, None])
    z = z / np.linalg.norm(z, axis=2).mean(0)[:, None]  # equal band energy
    tail = signal.istft(z, SR, nperseg=256)[1]
    tail /= np.linalg.norm(tail[0])
    return signal.oaconvolve(coloured(x, ECHO_SPECTRUM), tail, axes=1)[:, :N]


def yard():
    """Distant outdoor wash: partly correlated noise in drifting patches, plus a faint wavering hum."""
    frames, hz = N // 256 + 5, np.fft.rfftfreq(1024, 1 / SR)
    a, b, c, d, patches = rng.standard_normal((frames, 513, 5)).T
    patches = evened(uniform_filter1d(uniform_filter1d(patches, 10, 0), 14, 1))
    same = np.clip(read(YARD_LIKENESS, hz), -1, 1)[:, None]
    left, other = a + 1j * b, c + 1j * d
    z = np.array([left, same * left + np.sqrt(1 - same ** 2) * other])
    z *= gain_of(read(YARD_SPECTRUM, hz)[:, None] + 3.5 * patches)
    wash = evened(signal.istft(z, nperseg=1024, noverlap=768)[1][:, :N])
    (wash_db,), _ = curves([YARD_LEVEL])

    (hum_db,), on = curves([HUM_LEVEL])
    waver = uniform_filter1d(rng.standard_normal((2, N)), 3000)
    pitch, loudness = evened(uniform_filter1d(waver, 3000))
    hum = np.sin(2 * np.pi * np.cumsum(HUM_HZ + 4.4 * pitch) / SR)
    hum *= gain_of(hum_db + 1.3 * loudness) * on
    return gain_of(wash_db) * wash + hum


def gain_of(db):
    """Decibels to a factor."""
    return 10 ** (np.asarray(db) / 20)


def evened(x):
    """Scales to rms 1."""
    return x / np.sqrt(np.mean(x ** 2) + 1e-20)


def read(points, hz):
    """Reads a spectrum on a log-frequency axis."""
    f, value = np.transpose(points)
    return np.interp(np.log(hz + 1), np.log(f + 1), value)


def coloured(x, points):
    """Filters by a spectrum."""
    size = next_fast_len(x.shape[-1], True)
    gain = gain_of(read(points, np.fft.rfftfreq(size, 1 / SR)))
    return irfft(rfft(x, size) * gain, size)[..., :x.shape[-1]]


def curves(tables):
    """Joins tables in time: one array a column, and a smoothed mask, 1 while one of them runs."""
    t = np.arange(N) / SR
    s, *columns = np.concatenate(tables).T
    on = sum((t >= rows[0][0]) & (t < rows[-1][0]) for rows in tables)
    return [np.interp(t, s, c) for c in columns], uniform_filter1d(np.minimum(on, 1.), 200)


def scene():
    """The can and chirps with their echoes over the yard; the left port is a little farther."""
    rings = can_rings()
    near = saw(rings) + rub() + knocks(rings) + chirps()
    direct = np.array([np.roll(near[0], 2), near[1]])  # left 2 samples late
    return direct + echoes(near) + yard()


def record(dry):
    """Port cavities ring at their own treble pitch; the circuit hisses, peaks clip; then the band limit."""
    size = next_fast_len(N, True)
    hz = np.fft.rfftfreq(size, 1 / SR)
    ports = [gain_of(db) * f ** 2 / (f ** 2 - hz ** 2 + 1j * hz * width) for f, width, db in PORTS]
    heard = irfft(rfft(dry, size) * ports, size)[:, :N]
    heard += gain_of(HISS_DB) * rng.standard_normal((2, N))
    lowpass = signal.firwin(511, BAND_LIMIT_HZ, window=("kaiser", 9), fs=SR)
    return signal.oaconvolve(np.clip(heard, -1.0, 1.0), lowpass[None], "same")


dry = scene()
out = record(dry)
store_wav(out)
```